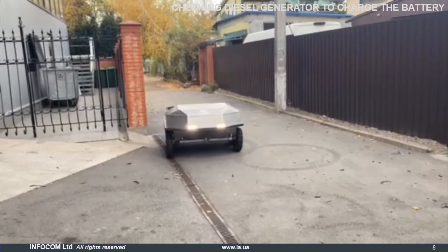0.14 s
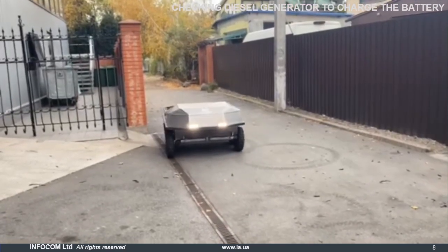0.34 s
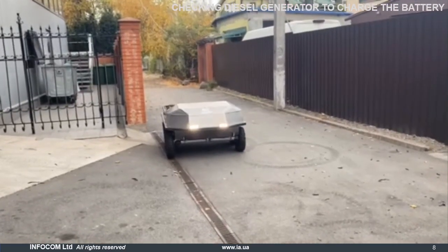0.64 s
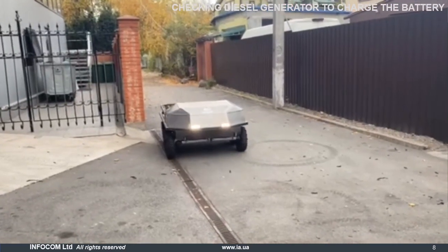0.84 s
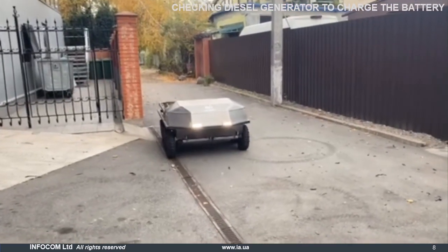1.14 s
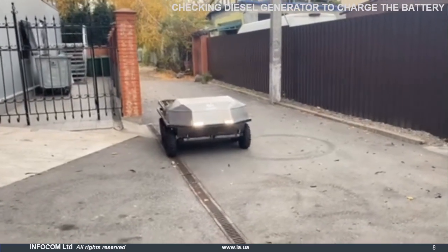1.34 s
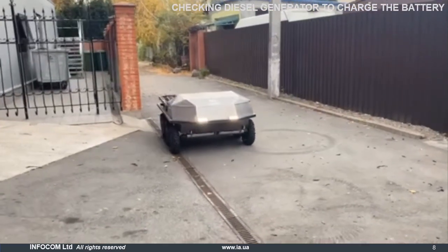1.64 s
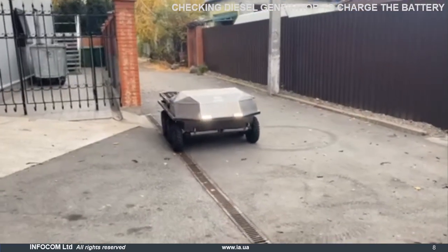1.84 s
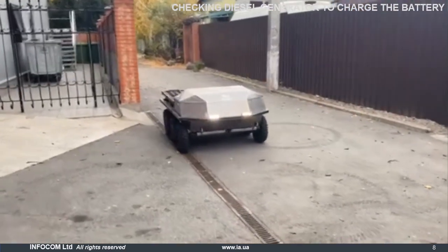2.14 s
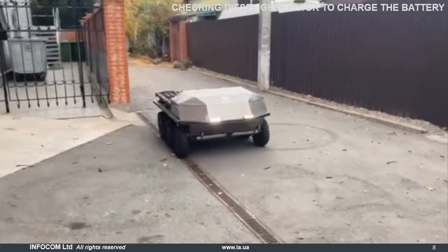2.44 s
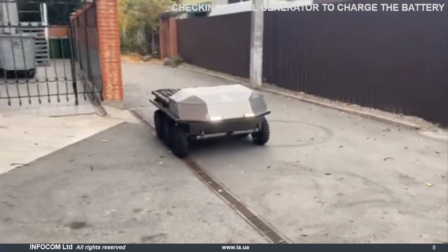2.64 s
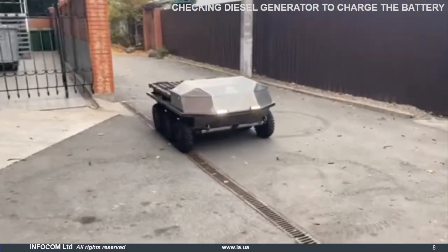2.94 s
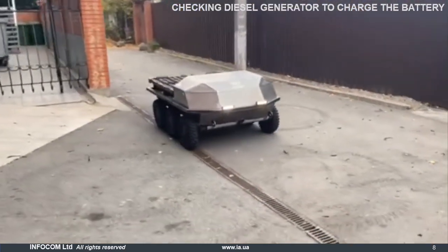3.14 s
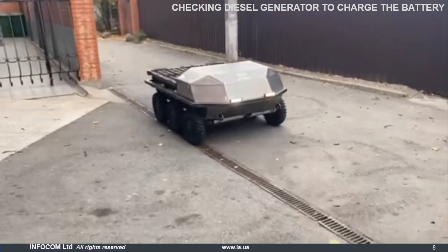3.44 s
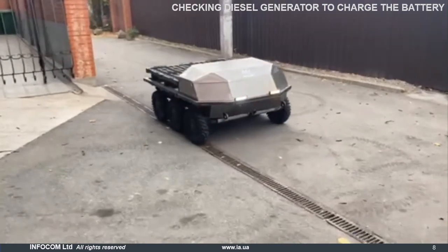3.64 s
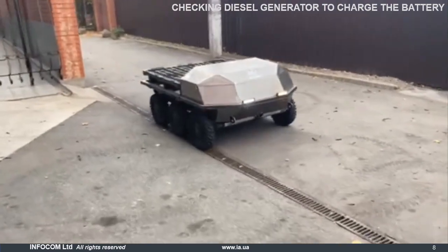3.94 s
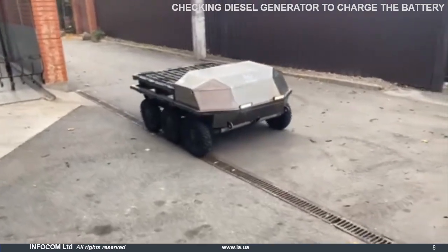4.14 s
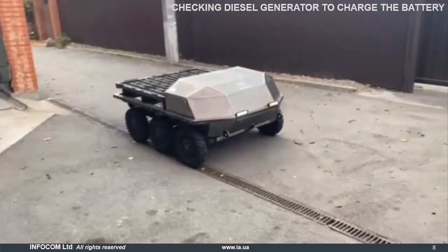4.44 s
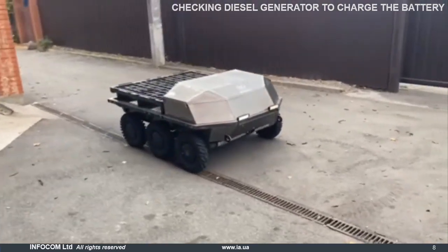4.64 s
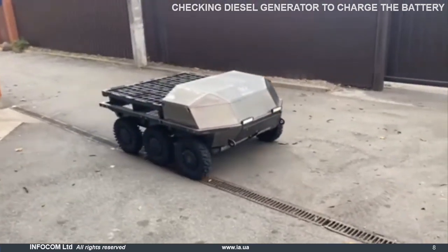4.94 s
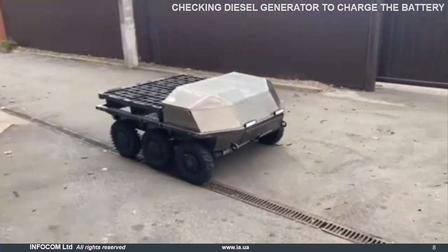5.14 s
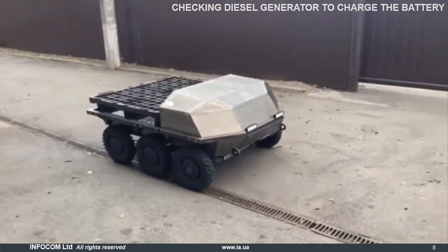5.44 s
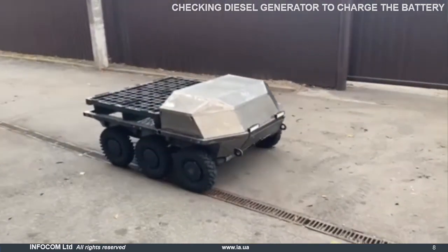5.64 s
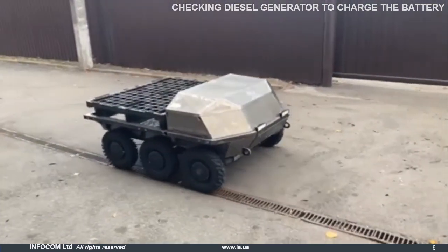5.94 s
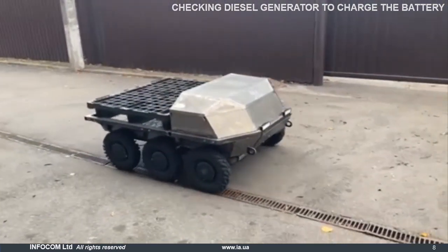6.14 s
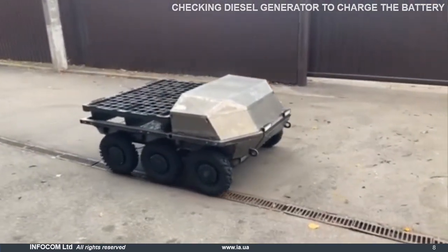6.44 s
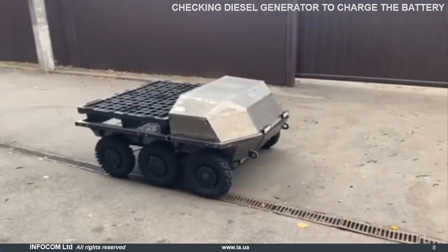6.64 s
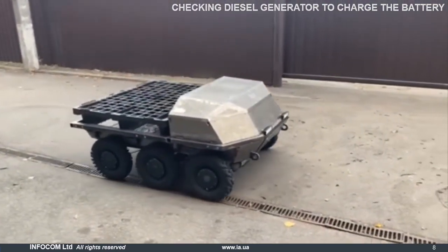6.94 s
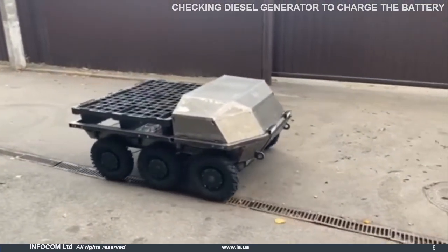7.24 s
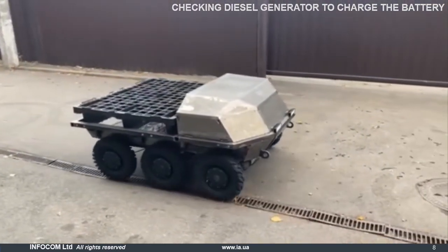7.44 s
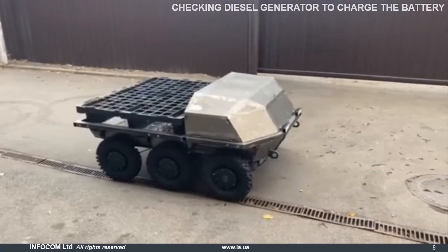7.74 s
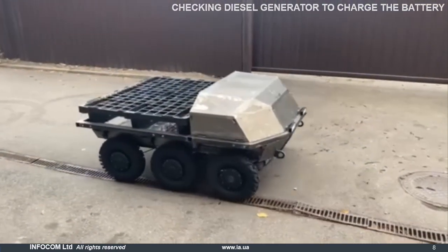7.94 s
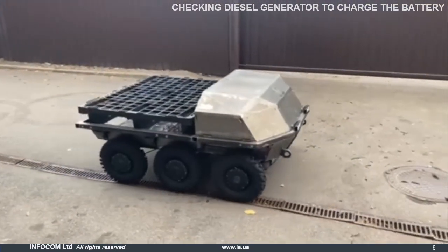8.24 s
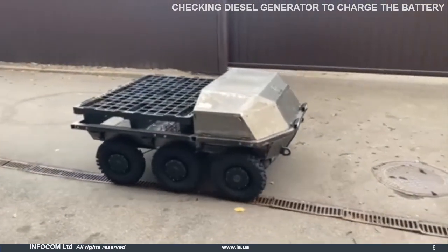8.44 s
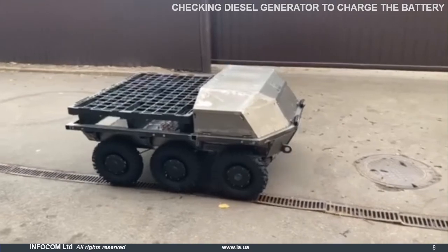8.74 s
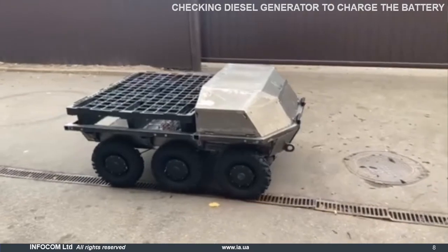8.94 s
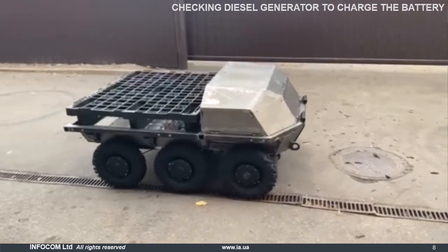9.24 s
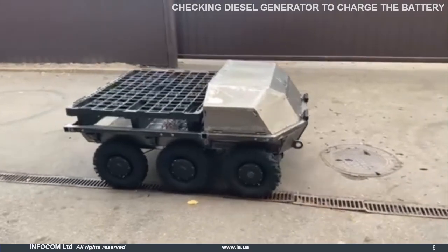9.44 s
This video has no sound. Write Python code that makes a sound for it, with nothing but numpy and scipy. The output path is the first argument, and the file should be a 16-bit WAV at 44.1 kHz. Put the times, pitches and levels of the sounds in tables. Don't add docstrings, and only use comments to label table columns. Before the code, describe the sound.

A small one-cylinder diesel generator on a slow wheeled vehicle runs at constant speed, about twenty-six rapid knocks a second over a clean low exhaust hum and boxy metal hull drone. Valve clatter and thin fan hiss ride on top. It creeps closer in a fenced paved lane, becoming clearer and brighter near the middle, with sparse grit crunches and one brief tyre squeak late. Handheld stereo microphone, wide echoes off the fences.

```python
import sys
import numpy as np
from scipy import signal
from scipy.fft import rfft, irfft
from scipy.io import wavfile

SR = 44100
rng = np.random.default_rng(int(sys.argv[2]) if len(sys.argv) > 2 else 0)


def elevation(decibels):
    levels = np.asarray(decibels, float)
    return 10 ** (levels / 20)


def log_audio(samples):
    frames = np.atleast_2d(samples).T
    limited = np.clip(frames, -1, 1)
    pcm = np.round(limited * 32767).astype(np.int16)
    wavfile.write(sys.argv[1], SR, pcm)


N = 423360
FIRING_HZ = 26.39
TILE = round(SR / FIRING_HZ)
CYCLES = N // TILE + 3

# start_s, lead_cycles (over a steady clock)
FIRING_LEAD = [(0.4, -0.076), (1, -0.07), (2, -0.063), (3, -0.034), (4, -0.007), (5, -0.009), (6, -0.017),
               (7, -0.044), (8, -0.064), (9.2, -0.083)]

# pitch_hz, level_db (per Hz)
DRONE_COLOUR = [(300, -27), (370, -8.5), (420, -3.5), (460, -7), (520, -3), (590, -1), (660, -14),
                (690, -3.5), (740, -6), (900, -13), (1100, -52)]
# pitch_hz, level_db (per Hz)
KNOCK_COLOUR = [(600, -41), (800, 2.5), (1050, 5.5), (1500, 8), (2200, -0.5), (2600, 0), (3250, 1.5),
                (4300, 1), (5500, -11), (7000, -15)]
# pitch_hz, level_db (per Hz)
VALVE_COLOUR = [(250, 12), (600, 11), (1000, 7), (2000, 8.5), (2700, 1.5), (3800, 4.5), (5000, -0.5),
                (6500, -0.5), (8500, -8), (9600, -2), (10250, -1.5), (11300, -8.5), (13000, -27)]
# pitch_hz, level_db (per Hz)
FAN_COLOUR = [(9000, -31), (11000, -14), (12000, 17), (13200, 0), (14800, 4), (15700, -3)]
# pitch_hz, level_db (per Hz)
LANE_COLOUR = [(20, -6), (30, 3), (60, -4), (120, 10), (200, 10), (320, 10), (500, -27.5)]
# pitch_hz, memory_cycles
KNOCK_MEMORY = [(300, 13), (700, 10), (1300, 6.5), (2000, 4.2), (3600, 1.6), (6000, 0.65)]

# pitch_hz, side_over_mid_db
WIDTH = [(40, -23), (150, -6), (350, -6.5), (900, -2.5), (1700, -3.5), (2500, -16), (3800, -10),
         (5600, -1.5)]
# pitch_hz, side_db
TREBLE_WIDTH = [(4500, 0), (5500, -3), (6100, -14), (6900, -20), (7700, -2), (8600, -7), (9600, -24)]
# pitch_hz, left_over_right_db
PORT_BALANCE = [(60, -1), (300, -2), (1600, -2.5), (2200, -0.5), (2700, 2.5), (4300, 0), (5000, 0.5),
                (6200, 0), (7900, -1), (9000, 2)]
# pitch_hz, right_lead_rad
PORT_LEAD = [(100, -0.17), (1500, -0.23), (2600, -1.1), (4000, -0.44), (4900, -0.71), (6000, 0.44),
             (6800, -1.2)]
# pitch_hz, right_lead_half_turns (pi rad)
PORT_HALF_TURNS = [(6700, 0), (8500, 1), (10200, 2), (12050, 3), (13950, 4), (15800, 5)]

PIPE_ORDERS, BOX_ORDERS = (2, 3, 4, 7), (5, 6, 8, 9, 10, 11, 12)
PANEL_ORDERS = (21, 22, 23, 24, 17, 20, 25, 26)
# level_db, gain_over_pass_db, fade_period_s, first_fade_s, echo_share (0-1)
PIPE_FADES = [(-33.5, -6.3, 10.5, 3.8, 0.37), (-21, -5.5, 8.2, 6.9, 0.25), (-21, 12.5, 6.36, 3.26, 0.16),
              (-21, 7.5, 3.95, 3.55, 0.15)]
# level_db, gain_over_pass_db, fade_period_s, first_fade_s, echo_share (0-1)
BOX_FADES = [(-38.5, 9.5, 27, 5, 1), (-32, -17, 11.3, 0.22, 0.49), (-28.5, 4, 7.4, 1.28, 0.43),
             (-35.5, -6, 12.5, 0.86, 0.59), (-47.5, 9.5, 4.9, 0.58, 0.87), (-41, -5, 15, 1.25, 1),
             (-34, -4.1, 2.134, 1.9, 0.26)]
# level_db, gain_over_pass_db, fade_period_s, first_fade_s, echo_share (0-1)
PANEL_FADES = [(-36.5, -1.8, 2.27, .66, .38), (-34, 8.6, 4.1, 1.4, .4), (-39, 4.4, 5.03, 1.34, .65),
               (-37.5, -2.3, 5.0, 4.8, .53), (-45, 3.0, 4.75, 2.3, .46), (-41, 1.5, 4.35, 3.8, .42),
               (-42, 1.9, 4.67, 1.27, .47), (-39, 2.5, 8.5, 8.0, .34)]
# order (multiple of firing), centre_s
WALL_CANCELS = [(7, .1), (8, 1), (8, 2.9), (9, 1), (9, 3.3), (10, .5), (10, 2.4), (12, 1.7), (12, 3.8),
                (17, 2.9), (17, 6.5), (20, 1.9), (20, 7.7), (21, 2.9), (21, 5.5), (21, 7.3), (21, 8.4),
                (22, .4), (22, 5.7), (23, 1), (24, .85), (24, 2.3), (24, 4), (25, 1.1), (25, 2.8),
                (25, 3.6), (25, 6), (26, .6), (26, 4.7), (26, 7.3)]
# pitch_hz, level_db, facing_s, span_s, peak_cycles (after the firing)
CASING_PANELS = [(1160, -31, 7.4, 1.5, .52), (1160, -33.5, 8.9, .7, .45), (1150, -38, 4.7, .8, .27),
                 (1325, -30.5, 3.35, 1.05, .35), (1330, -38, 1.6, .7, .42), (1330, -37, 4.3, .8, .6),
                 (1345, -36, 5.8, 1.2, .33), (1340, -34.5, 8.8, .6, .3), (1490, -33.5, 6.0, 1.2, .29),
                 (1480, -35.5, 8.2, 1.1, .28), (1960, -35.5, 4.4, 1.1, .39), (2080, -37, 4.6, 1.2, .58),
                 (1900, -37, 6.3, 2.4, .25), (1810, -36, 7.9, .8, .6), (1950, -37.5, 8.2, .9, .4),
                 (2050, -38, 2.1, .7, .6), (3720, -36, 3.9, .6, .35), (3600, -37, 5.2, .6, .35),
                 (3720, -36, 2.4, 1.2, .42), (3690, -37, 8.6, .9, .38), (3690, -36, .3, .7, .46),
                 (3270, -42, 5.0, 4.0, .28), (4000, -41, 5.4, 2.2, .34), (5300, -45, 5.2, 1.6, .28)]
# start_s, level_db, length_s
GRIT_CRUNCHES = [(0.618, -36, .02), (4.517, -36, .02), (5.312, -36, .02), (5.464, -30, 0.018),
                 (5.842, -34, .02), (6.375, -32, 0.017), (7.133, -34, 0.019), (7.438, -39, .02),
                 (7.878, -39, 0.045), (8.193, -36, .02), (8.88, -38, .02)]

PASS_S = 9.6
CLOSEST_S, RANGE_S = 6.06, 5.23
TURN_S, TURN_SPAN_S = 3.5, 1.2
BODY_DB, BODY_TURN_DB, ECHO_DB, ECHO_TURN_DB = -43, 3.5, 5, -9.5
VALVES_DB, FAN_DB, FAN_BEAM = -38.5, -54, 3.4
AWAY_DB, RING_DB, CASING_Q = -18, -1.8, 14
CASING_GAIN_DB, CASING_TILT_DB = -2, 1.58
PANEL_LAG, PANEL_LAG_TURN = .78, -.4
SECOND_THUMP_S, SECOND_THUMP_SPAN_S = 5.6, .25
CANCEL_DB, CANCEL_S = -11, .17


def at_hz(points, hz):
    table_hz, value = np.transpose(points)
    return np.interp(np.log(hz + 1e-3), np.log(table_hz), value)


def rms_one(x):
    return x / np.sqrt(np.mean(np.abs(x) ** 2) + 1e-20)


def unit(gain):
    return gain / np.sqrt(np.sum(np.abs(gain) ** 2, axis=-1, keepdims=True))


def drift(rate, size):
    r = np.exp(-200 * np.pi * rate / SR)
    return rms_one(signal.lfilter([1], [1, -2 * r, r * r], rng.standard_normal(size + 2000))[2000:])


def remembered(fresh, keep):
    out, first, second = np.empty_like(fresh), 0, 0
    for c, new in enumerate(fresh):
        first = keep * first + new
        second = keep * second + first
        out[c] = second
    return out


def stereo(mid, side):
    return np.array([mid + side, mid - side])


def side_gain(hz):
    return elevation(at_hz(WIDTH, hz) + at_hz(TREBLE_WIDTH, hz))


def hiss(colour):
    hz = np.fft.rfftfreq(N, 1 / SR)
    mid, side = rfft(rng.standard_normal((2, N))) * elevation(at_hz(colour, hz))
    return rms_one(irfft(stereo(mid, side * side_gain(hz)), N))


def turned(t):
    return 1 / (1 + np.exp((TURN_S - t) / TURN_SPAN_S))


def distance_db(t):
    return 10 * np.log10(1 + ((t - CLOSEST_S) / RANGE_S) ** 2)


def fading(multiples, rows, t):
    levels_db = []
    for k, (level_db, gain_db, period, fade_s, share) in zip(multiples, rows):
        echo = min(share, .95) * np.exp(2j * np.pi * (t - fade_s) / period)
        order_db = level_db + gain_db * (t / PASS_S - .5) + 20 * np.log10(np.abs(1 - echo))
        for order, cancel_s in WALL_CANCELS:
            if order == k:
                order_db = order_db + CANCEL_DB * np.exp(-((t - cancel_s) / CANCEL_S) ** 2)
        levels_db.append(order_db)
    return levels_db


def orders(multiples, rows, t, turns, chirp, flutter_db, turn_rad, odd_slip=0):
    coarse_t, turns = t[::100], turns[::10]
    out, fine, coarse = 0, np.arange(len(turns)) / 10, np.arange(N // 100 + 1)
    bend, centre, start_rad = chirp
    for k, level_db in zip(multiples, fading(multiples, rows, coarse_t)):
        shake, flutter, left, turn = (drift(rate, len(coarse)) for rate in (3.5, 6.3, 0.13, 0.17))
        apart = turn_rad * k / 8 * np.outer([1, -1], 0.29 * left + 1j * turn)
        slip = .0065j * k * shake + 1j * odd_slip * (k % 2)
        gain = elevation(level_db + flutter_db * flutter) * np.exp(apart + slip)
        carrier = np.exp(1j * (2 * np.pi * k * turns + bend * (k - centre) ** 2 + start_rad))
        out = out + np.sqrt(2) * np.real([np.interp(fine, coarse, g) * carrier for g in gain])
    return signal.resample_poly(out, 10, 1, axis=1)


def blow(turns, start, fall_db, floor_db, uneven_db):
    since = (turns - start) % 1
    strength = rng.standard_normal(CYCLES)[(turns - start + 1).astype(int)]
    hit = np.minimum(since / 0.082, 1) * elevation(fall_db * since + uneven_db * strength)
    return rms_one(np.sqrt(hit ** 2 + elevation(2 * floor_db)))


def repeating(gain, echo_db, turns, struck=0):
    hz = np.arange(TILE // 2 + 1) * FIRING_HZ
    keep = np.exp(-1 / np.maximum(at_hz(KNOCK_MEMORY, hz), .1))
    fresh = rng.standard_normal((CYCLES + 40, 2, len(hz), 2)) @ [1, 1j]
    shape = remembered(fresh, keep)[40:]
    shape = shape / np.sqrt(np.mean(np.abs(shape) ** 2, axis=0)) * gain[:, None]
    side = shape[:, 1] * side_gain(hz) * elevation(echo_db[:, None])
    tiles = irfft(stereo(shape[:, 0] + struck, side), TILE) * TILE / np.sqrt(2)
    fade = np.sin(np.pi / 2 * np.arange(TILE) / TILE) ** 2
    stream = (tiles[:, :-1] * (1 - fade) + tiles[:, 1:] * fade).reshape(2, -1)
    return stream[:, ((turns + 1) * TILE).astype(int)]


def exhaust(turns, t):
    return orders(PIPE_ORDERS, PIPE_FADES, t, turns, (.855, 4.32, .11), flutter_db=0.15, turn_rad=0.11)


def hull_box(turns, t):
    return orders(BOX_ORDERS, BOX_FADES, t, turns, (.2, 8, .3), flutter_db=1.0, turn_rad=0.16)


def hull_panels(turns, t):
    late_turns = turns - PANEL_LAG - PANEL_LAG_TURN * turned(t)
    slip = np.pi / 2 / (1 + np.exp((SECOND_THUMP_S - t[::100]) / SECOND_THUMP_SPAN_S))
    return orders(PANEL_ORDERS, PANEL_FADES, t, late_turns, (.2, 22.4, 0), flutter_db=.6, turn_rad=.11,
                  odd_slip=slip)


def lane_rumble():
    return elevation(-40) * hiss(LANE_COLOUR)


def knock(turns):
    s, k = (np.arange(CYCLES) - 1.5) / FIRING_HZ, np.arange(TILE // 2 + 1)
    hz = k * FIRING_HZ
    body_db = BODY_DB + BODY_TURN_DB * turned(s)
    echo_db = ECHO_DB + ECHO_TURN_DB * turned(s)
    power = np.outer(elevation(body_db + 9.0), unit(elevation(at_hz(KNOCK_COLOUR, hz)))) ** 2
    rings = 0
    chance = (CYCLES, len(CASING_PANELS))
    late, strong = (remembered(rng.standard_normal(chance), share) for share in (.75, .6))
    for i, (centre_hz, facing_db, facing_s, span_s, peak) in enumerate(CASING_PANELS):
        tilt_db = CASING_TILT_DB * np.log2(centre_hz / 1300)
        away_db = AWAY_DB * (1 - np.exp(-((s - facing_s) / span_s) ** 4))
        level_db = facing_db + CASING_GAIN_DB + tilt_db + away_db
        width_hz = centre_hz / CASING_Q
        mode = 1 / (1 + 2j * (hz - centre_hz) / width_hz)
        start = peak - FIRING_HZ / (np.pi * width_hz) + .0015 * rms_one(late[:, [i]])
        strike_db = level_db + RING_DB + 0.5 * rms_one(strong[:, i])
        strike = elevation(strike_db)[:, None] * np.exp(-2j * np.pi * k * start)
        rings = rings + strike * unit(mode ** 2 * (hz > 700) * (hz < 7000))
        rough = elevation(level_db - 2.0)[:, None] * unit(np.abs(mode) ** 1.55)
        power += (1 - elevation(2 * RING_DB)) * rough ** 2
    shaken = repeating(np.sqrt(power), echo_db, turns)
    shaken = shaken * blow(turns, 0.22, fall_db=-11, floor_db=-9, uneven_db=0.86)
    drone_shape = elevation(-35.5) * unit(elevation(at_hz(DRONE_COLOUR, hz)) * (hz > 330))
    drone = np.outer(elevation(0.36 * (body_db + 41.5)), drone_shape)
    return shaken + repeating(drone, echo_db, turns, rings)


def valve_clatter(turns, t, burst_db):
    level = elevation(VALVES_DB - distance_db(t) + 9.5 + burst_db)
    return level * hiss(VALVE_COLOUR) * blow(turns, 0.14, fall_db=-20.5, floor_db=-4.5, uneven_db=2.0)


def fan_hiss(turns, t, burst_db):
    level = elevation(FAN_DB - FAN_BEAM * distance_db(t) + 5.0 + burst_db)
    return level * hiss(FAN_COLOUR) * blow(turns, .2, fall_db=-14, floor_db=-8, uneven_db=3.0)


def tyre_grit(t):
    shape = sum(elevation(db) * np.exp(-(2 * (t - s) / length - 1) ** 4) for s, db, length in GRIT_CRUNCHES)
    return shape * hiss([(2000, -32), (4000, 5), (7000, 0), (10300, 15.5), (12000, -8), (14000, -16),
                         (16000, -20)])


def tyre_squeak(t):
    since = t - 7.895
    return elevation(-31) * np.exp(-(since / .022) ** 2) * np.sin(2 * np.pi * (4350 * t + 2600 * since ** 2))


def scene():
    t = np.arange(N) / SR
    lead_s, lead_cycles = np.transpose(FIRING_LEAD)
    turns = FIRING_HZ * t + np.interp(t, lead_s, lead_cycles)
    burst_db = 1.9 * np.repeat(drift(1.8, N // 100 + 1), 100)[:N]
    tones = exhaust(turns, t) + hull_box(turns, t) + hull_panels(turns, t)
    engine = knock(turns) + valve_clatter(turns, t, burst_db) + fan_hiss(turns, t, burst_db)
    return tones + lane_rumble() + engine + tyre_grit(t) + tyre_squeak(t)


def band_limit(x):
    return signal.sosfilt(signal.butter(12, 15840, fs=SR, output="sos"), x)


def record(dry):
    hz, s, frames = signal.stft(dry, SR, nperseg=2048)
    sway = signal.lfilter([1], [1, -.45], rng.standard_normal((6, len(s))))
    half_turn_hz = np.transpose(PORT_HALF_TURNS)[0]
    sway = np.array([np.interp(hz, half_turn_hz, column) for column in sway.T]).T
    swing = np.pi * (at_hz(PORT_HALF_TURNS, hz)[:, None] + .14 * sway * (hz[:, None] > 6000))
    swing = swing - .5 * np.sin(2 * swing)
    lead = (at_hz(PORT_LEAD, hz) * (hz < 7000))[:, None] + swing - .3 * np.sin(2 * swing)
    port = elevation(at_hz(PORT_BALANCE, hz) / 2)[:, None] * np.exp(-.5j * lead)
    mix = signal.istft(frames * np.array([port, 1 / port]), SR, nperseg=2048)[1][:, :N]
    return band_limit(mix)


dry = scene()
out = record(dry)
log_audio(out)
```